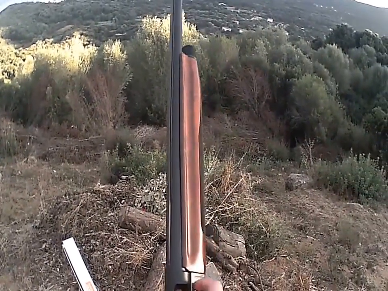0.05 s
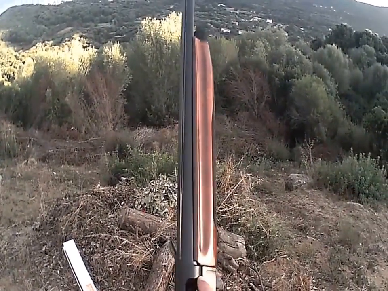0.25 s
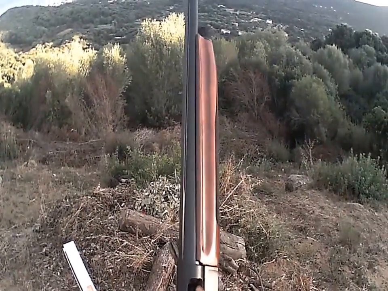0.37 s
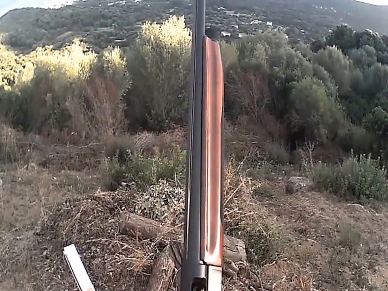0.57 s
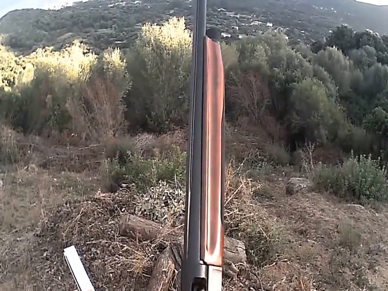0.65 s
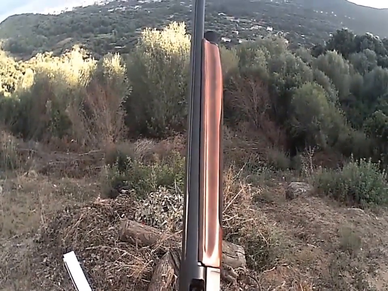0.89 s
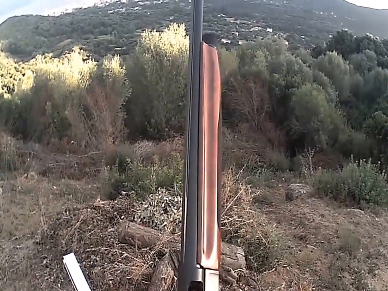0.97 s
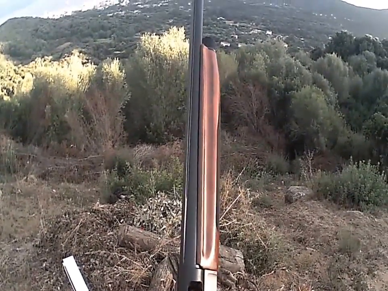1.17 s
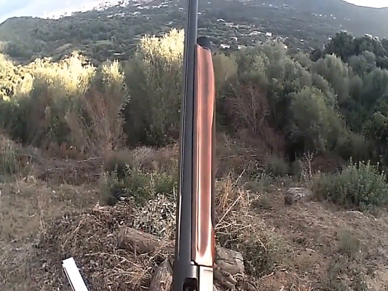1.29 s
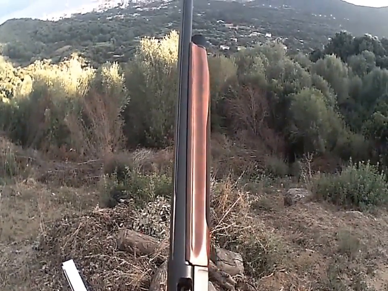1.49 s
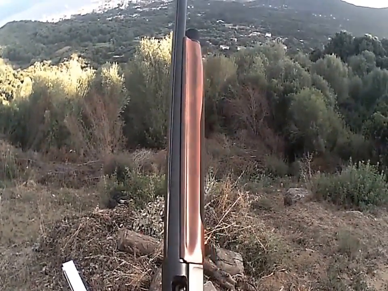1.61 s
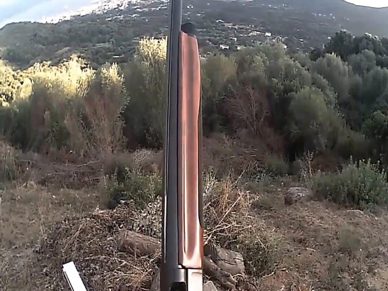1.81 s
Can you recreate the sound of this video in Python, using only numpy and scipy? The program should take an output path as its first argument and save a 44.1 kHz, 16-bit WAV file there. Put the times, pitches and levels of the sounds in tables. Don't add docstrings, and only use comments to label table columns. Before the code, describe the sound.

Close metallic clatter of a shotgun latch, quick steel impacts with loose parts chattering and a dry wooden knock, dies away fast; afterwards only faint ticks, soft hiss, low rumble and barely audible insect fizz in open air.

```python
import sys
import numpy as np
from scipy import signal
from scipy.io import wavfile

SR = 44100
rng = np.random.default_rng(int(sys.argv[2]) if len(sys.argv) > 2 else 0)


def volts_from_decibels(level):
    exponent = np.asarray(level, float) / 20
    return 10 ** exponent


def generate_wav(sig):
    pcm = np.round(np.clip(np.atleast_2d(sig).T, -1, 1) * 32767).astype(np.int16)
    wavfile.write(sys.argv[1], SR, pcm)


N = 81585


def evened(x):
    return x / np.sqrt(np.mean(x ** 2) + 1e-20)


def coloured(x, points):
    f, db = np.transpose(points)
    hz = abs(np.fft.fftfreq(16384, 1 / SR))
    log_gain = np.interp(np.log(hz + 1), np.log(f + 1), db) * np.log(10) / 20
    taps = np.fft.ifft(np.exp(np.conj(signal.hilbert(log_gain)))).real[:8192]
    return signal.oaconvolve(x, taps)[:len(x)]


def steady_noise(outline):
    return evened(coloured(rng.standard_normal(N + 8192), outline)[8192:])


def curve(points):
    s, db = np.transpose(points)
    return volts_from_decibels(np.interp(np.arange(N) / SR, s, db))


def modes(x, table):
    t = np.arange(4000) / SR
    ring = sum(volts_from_decibels(db - 60 * t / t60) * np.sin(2 * np.pi * hz * t) for hz, db, t60 in table)
    return signal.oaconvolve(x, ring)[:len(x)]


# frequency in Hz, density in dB per Hz.
HISS_COLOUR = [(53, -19), (90, -3), (314, -9), (416, -11), (1420, -16.5), (2440, -18.5), (14000, -27),
               (15600, -32)]
# frequency in Hz, density in dB per Hz.
HISS_EDGE = [(15750, -29.5), (16000, -75)]


def hiss():
    return volts_from_decibels(-57) * steady_noise([(60, -39)] + HISS_COLOUR[1:-1] + HISS_EDGE)


# time in seconds, level in dB.
GUSTS = [(0.0, -64), (0.02, -53.5), (0.496, -56.5), (0.512, -65), (0.632, -55), (0.856, -55),
         (1.094, -51.5), (1.296, -57), (1.312, -52), (1.688, -61.5), (1.698, -52.5), (1.82, -63.5)]


def gusts():
    return curve(GUSTS)


# frequency in Hz, density in dB per Hz.
WIND = [(15, -13), (24, -3), (40, -2.5), (62, -1), (90, -10), (140, -22)]


def wind():
    return volts_from_decibels(-3.5) * gusts() * steady_noise([(12, -53.5)] + WIND + [(300, -63.5)])


# frequency in Hz, level in dB, drift as a share of the frequency.
DRONE = [
    (29.7, -6, .07),
    (49.2, -6, .055),
]


def far_engine():
    t = np.arange(N) / SR
    drone = np.zeros(N)
    for hz, db, drift in DRONE:
        sway = evened(sum(np.sin(2 * np.pi * (f * t + rng.random())) for f in np.geomspace(.6, 5, 8)))
        phase = 2 * np.pi * np.cumsum(hz * (1 + drift * sway)) / SR
        drone += volts_from_decibels(db) * np.sqrt(2) * np.sin(phase)
    return gusts() * drone


CREEP_S = [.1645, .1695, .1760, .1832, .1836, .1943, .1960, .2030, .2115]
# peak in dB, ring in Hz, ring t60 in seconds, crack in dB relative to the ring.
CREEP = [(-49, 6500, 0.02, -10.5), (-41, 3200, .010, 2.5), (-47.5, 5700, 0.14, -4),
         (-31.5, 1940, 0.018, -11), (-41, 15100, 0.019, 4), (-19.5, 11800, .008, -9.5),
         (-35.5, 7400, 0.012, 8), (-50, 1700, 0.057, 5), (-47.5, 4930, 0.042, 5)]
LATCH_S = [.2185, .2187, .2208, .2244, .2269, .2273, .2277, .2290, .2296, .2303, .2325, .2345, .2385, .2410,
           .2440, .2633, .2646, .2713, .2727]
# peak in dB, ring in Hz, ring t60 in seconds, crack in dB relative to the ring.
LATCH = [(-13, 5700, 0.0064, -6.5), (-21, 3900, .008, 1.5), (-6.5, 4170, 0.0065, -9.5),
         (-13, 11700, .009, -2), (-5, 6560, 0.0072, -2.5), (-13, 13350, 0.017, -9),
         (-10.5, 1590, 0.011, -14), (-23.5, 14000, .018, 2), (-9, 7300, 0.0051, -1.5),
         (-10.5, 2900, 0.013, -7), (-16, 14535, .028, -12), (-20.5, 4000, 0.017, 2),
         (-23, 5600, .009, -1.5), (-31, 5600, 0.0061, -7.5), (-51, 1480, 0.027, 8.5),
         (-23.5, 5600, .0065, -4.5), (-37, 6100, .007, -5), (-26.5, 5900, 0.0097, -6.5),
         (-41, 5200, 0.0098, -8)]
# start in seconds, peak in dB, ring in Hz, ring t60 in seconds,
# crack in dB relative to the ring.
HANDLING = [(0.448, -49.5, 2860, 0.018, 2), (0.453, -47.5, 3510, 0.019, -2), (0.462, -58.5, 2500, .03, 9),
            (0.4736, -40.5, 5000, 0.006, 4.5), (0.4738, -42.5, 8160, 0.011, -25),
            (1.245, -59, 3870, .01, 4), (1.2518, -37.5, 6440, 0.013, -13), (1.2510, -39, 10900, 0.0069, 0),
            (1.2522, -44, 14800, 0.0099, 1), (1.2520, -42.5, 3270, 0.021, 2),
            (1.2525, -50.5, 1120, 0.039, -4), (1.2609, -41.5, 3800, 0.021, 0),
            (1.267, -55, 3020, 0.018, -2), (1.3104, -45.5, 1120, 0.04, -2), (1.336, -51.5, 3260, .02, -6),
            (1.3355, -50, 13800, .010, 1), (1.3522, -39, 13600, 0.013, -3.5),
            (1.4000, -51.5, 3200, 0.022, -5), (1.4600, -61, 4980, .015, 10),
            (1.5130, -55.5, 9900, 0.014, 8), (1.5180, -53, 4900, 0.018, 0), (1.8370, -49, 4730, 0.011, 0.5),
            (1.8440, -47, 725, 0.029, -3)]


def gun_blows():
    return [(s, *sound) for s, sound in zip(CREEP_S + LATCH_S, CREEP + LATCH)] + HANDLING


def impacts(blows):
    rise_s, pair_spread_hz, pair_db, ring_db = .00005, 330, -6, -3
    near_db, near_q, crack_t60_share = 13, 1.25, 0.9
    ring, crack, push = np.zeros(N), np.zeros(N), np.zeros(N)
    for s, db, hz, t60, crack_db in blows:
        at = int(s * SR)
        t = np.arange(min(2500, N - at)) / SR
        rise = volts_from_decibels(db) * (1 - np.exp(-t / rise_s))

        noise = rng.standard_normal(2500)
        near = evened(signal.lfilter(*signal.iirpeak(hz, near_q, SR), noise))
        noise = evened(noise + volts_from_decibels(near_db) * near)[:len(t)]
        crack[at:at + len(t)] += rise * volts_from_decibels(crack_db - 60 * t / (t60 * crack_t60_share)) * noise

        a, b = rng.random(2)
        other_hz = hz + pair_spread_hz * (.5 + a) * np.sign(b - .5) * min(hz / 4000, 1)
        pair = np.sin(2 * np.pi * hz * t) + volts_from_decibels(pair_db) * np.sin(2 * np.pi * (other_hz * t + b))
        ring[at:at + len(t)] -= rise * volts_from_decibels(ring_db - 60 * t / t60) * pair

        push[at + 2] -= volts_from_decibels(db + crack_db)
    return ring, crack, push


# time in seconds, level in dB.
RATTLE = [(.160, -84), (.170, -60), (.212, -49.5), (.2183, -53), (.2190, -31), (.2265, -27), (.2290, -22.5),
          (.240, -35.5), (.252, -61), (.290, -72), (.33, -100)]


def loose_parts():
    per_s, spread_db = 9000, 2
    size = volts_from_decibels(spread_db * np.minimum(rng.exponential(1, N), 3.5))
    grains = size * (rng.random(N) < per_s / SR) * rng.choice([-1., 1.], N)
    return curve(RATTLE) * evened(grains)


# frequency in Hz, level in dB, t60 in seconds.
STEEL = [(1975, -5, 0.028), (2280, -9, 0.017), (2857, -6, 0.025), (2960, -2, 0.023), (3330, -5.5, 0.023),
         (3865, -4.5, .016), (4590, -4, 0.019), (5680, -3, .014), (6030, -9, .015), (7140, -3.5, 0.017),
         (7720, -9, .016), (9160, -7, .016), (12600, -8, .012), (14530, -14, .018)]
# frequency in Hz, level in dB, t60 in seconds.
STOCK = [(626, -7, .03), (785, 1, 0.022), (940, -2, 0.014), (1014, -6, 0.018), (1220, 1, 0.017),
         (1436, 2.5, 0.022)]


def steel_and_stock(push, rattle, blows):
    shake = push * rng.choice([-1., 1.], N) + 0.26 * rattle
    weights = sorted((blow[0], min(2500 / blow[2], 1)) for blow in blows)
    heavy = np.interp(np.arange(N) / SR, *np.transpose(weights))
    knock = heavy * push + 0.39 * rattle
    return volts_from_decibels(-13.5) * modes(shake, STEEL) + volts_from_decibels(-18.5) * modes(knock, STOCK)


# frequency in Hz, level in dB.
CRACK = [(250, -64), (520, -26), (800, -4), (2500, -1.5), (5000, -4), (9000, -2), (15300, 2), (16100, -21)]


def gun():
    tick_db, low_cut_hz = 4, 583
    blows = gun_blows()
    ring, crack, push = impacts(blows)
    rattle = loose_parts()
    out = ring + coloured(crack + rattle + volts_from_decibels(tick_db) * push, CRACK)
    out += steel_and_stock(push, rattle, blows)
    return signal.sosfilt(signal.butter(3, low_cut_hz, "high", fs=SR, output="sos"), out)


# start in seconds, length in seconds, level in dB.
CHIRPS = [
    (.42, .03, -68),
    (0.571, .03, -68),
    (1.38, .015, -68),
    (1.418, .035, -59),
    (1.457, 0.037, -62),
    (1.548, .02, -70),
    (1.588, .02, -67),
    (1.687, .03, -67),
]


def insects():
    centre_hz, width_hz, throb_per_s = 15000, 1100, 70
    t = np.arange(N) / SR
    band = signal.butter(4, [centre_hz - width_hz / 2, centre_hz + width_hz / 2], "band", fs=SR)
    throb = 1.3 + np.sin(2 * np.pi * throb_per_s * t)
    fizz = evened(signal.lfilter(*band, rng.standard_normal(N)) * throb)
    bursts = sum(volts_from_decibels(db) * np.sin(np.pi * np.clip((t - s) / length, 0, 1)) for s, length, db in CHIRPS)
    return fizz * bursts


def scene():
    return (gun() + hiss() + wind() + far_engine() + insects())[None]


def top_cut(x):
    return signal.sosfilt(signal.butter(12, 16450, fs=SR, output="sos"), x)


def record(dry):
    edge = signal.firwin(255, 16350, window=("kaiser", 9), fs=SR)
    mix = signal.oaconvolve(dry, edge[None], "same")
    return top_cut(mix)


dry = scene()
out = record(dry)
generate_wav(out)
```